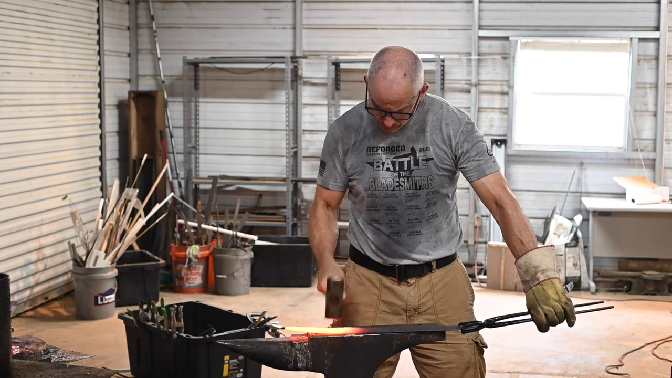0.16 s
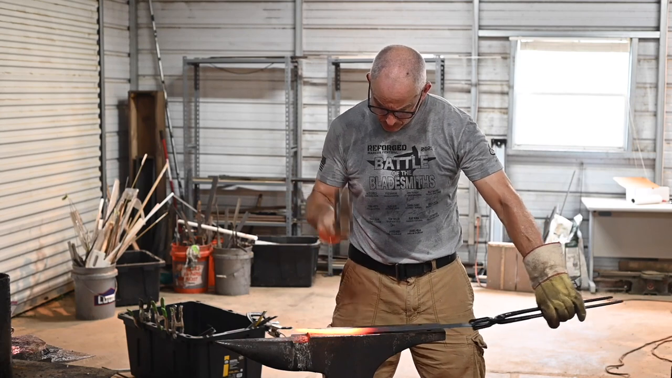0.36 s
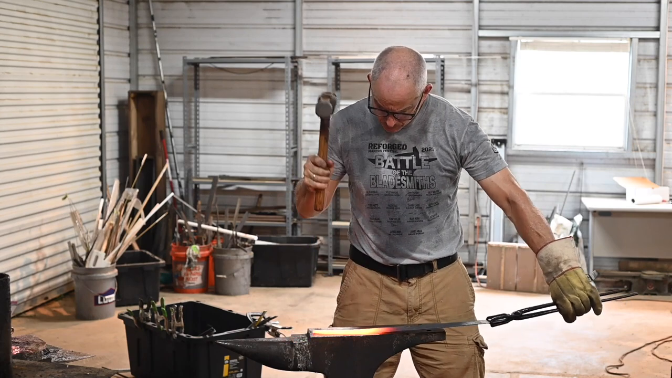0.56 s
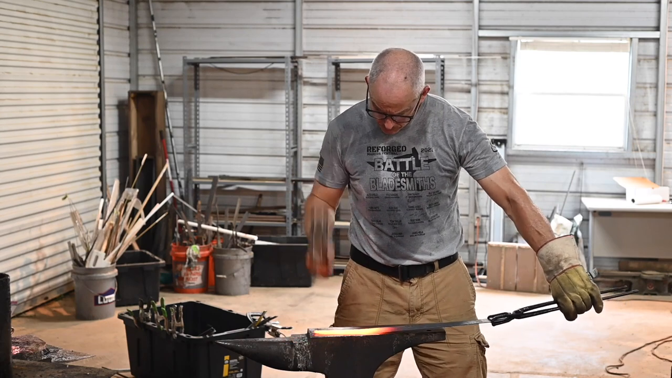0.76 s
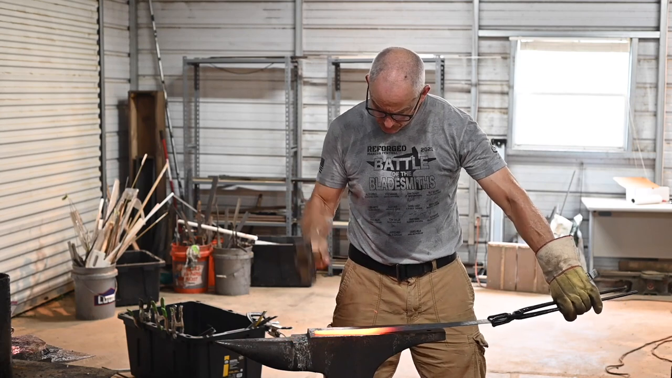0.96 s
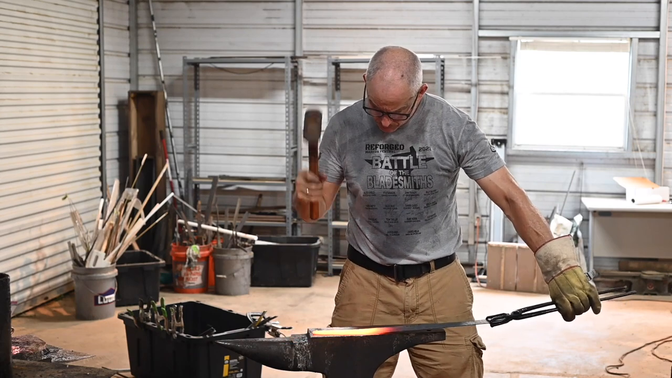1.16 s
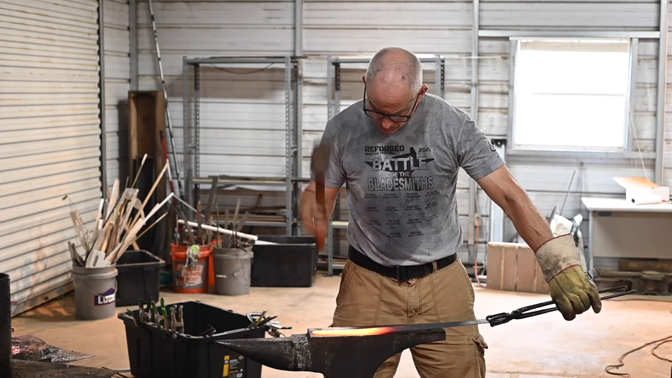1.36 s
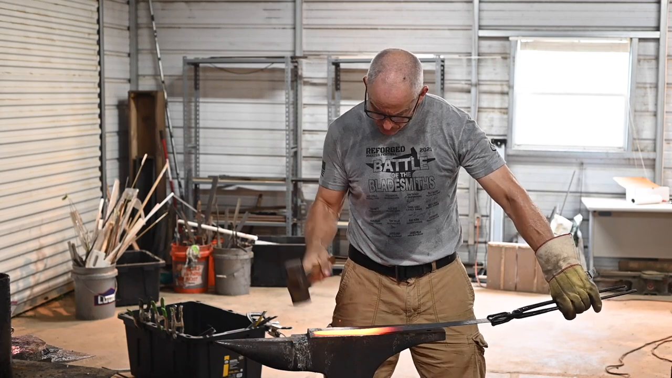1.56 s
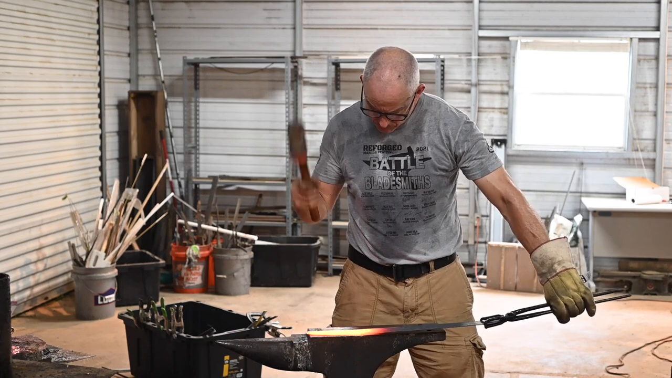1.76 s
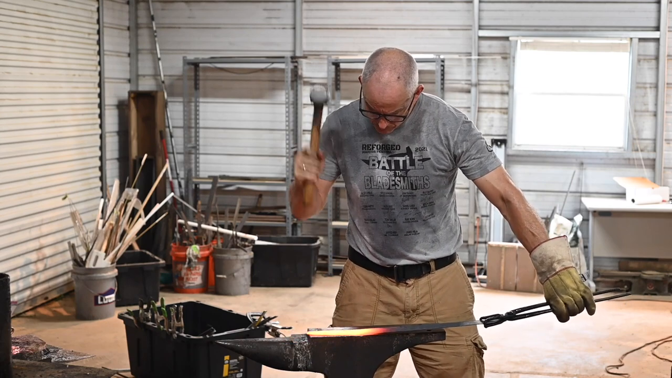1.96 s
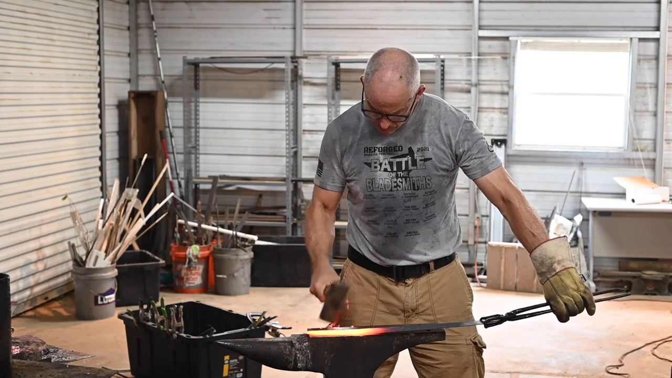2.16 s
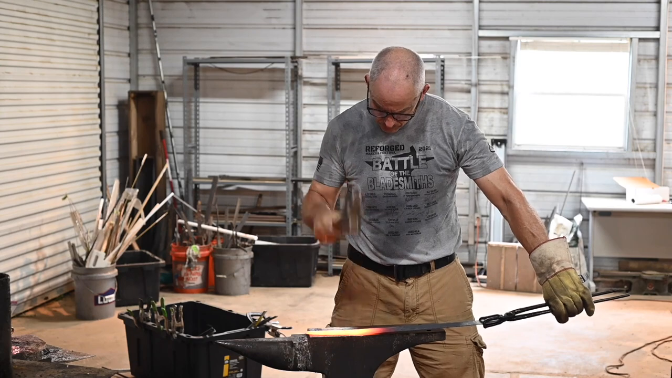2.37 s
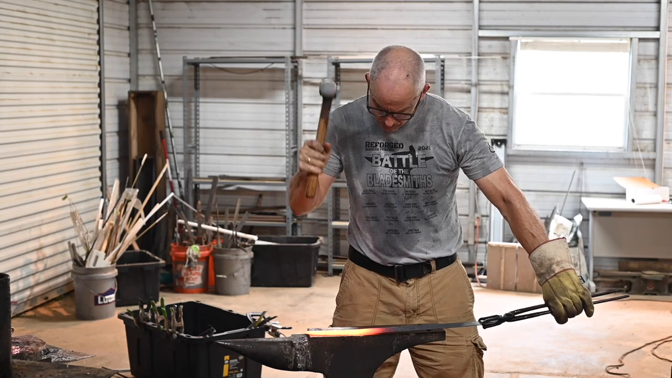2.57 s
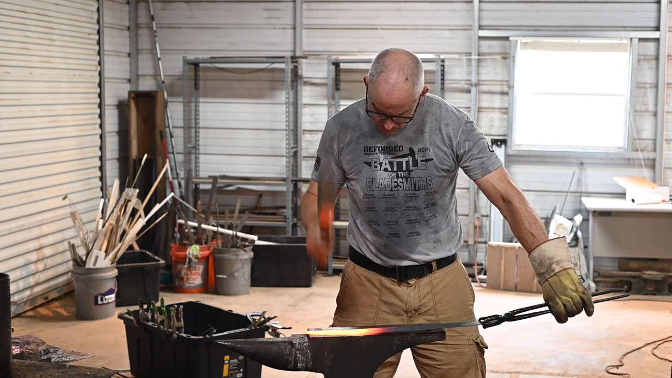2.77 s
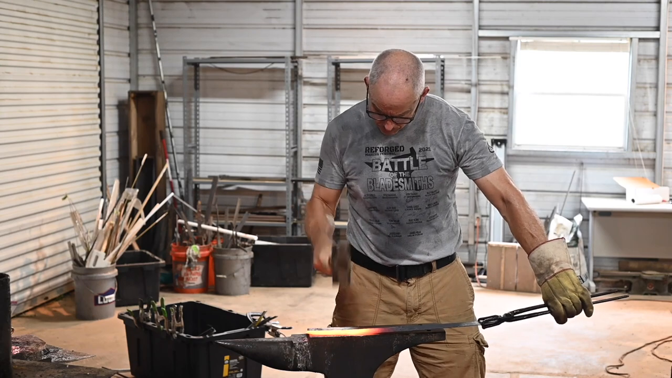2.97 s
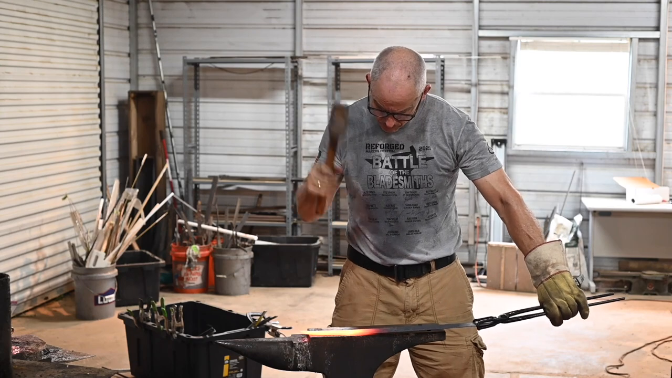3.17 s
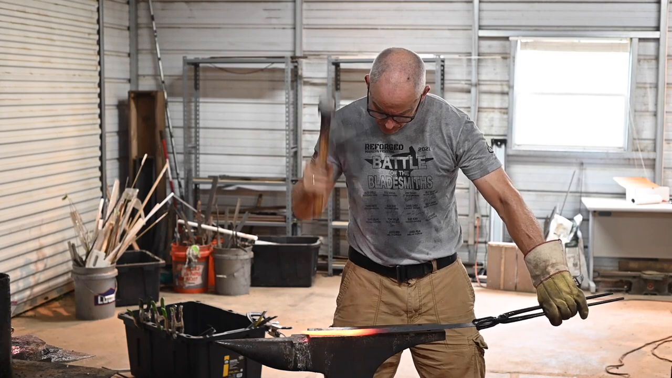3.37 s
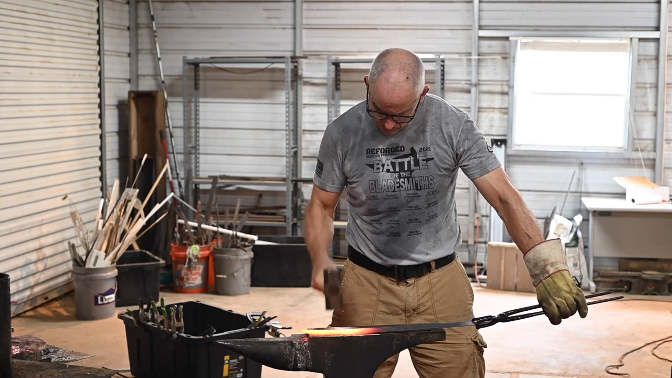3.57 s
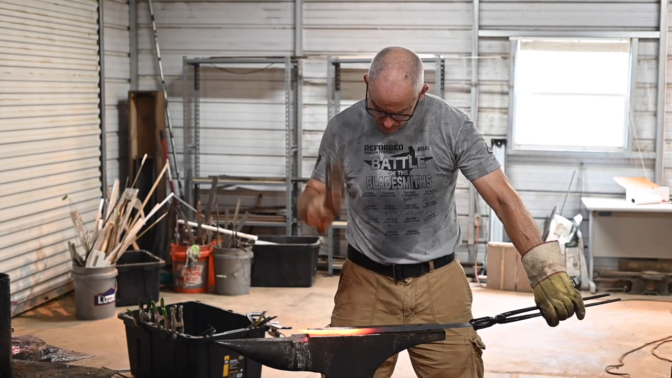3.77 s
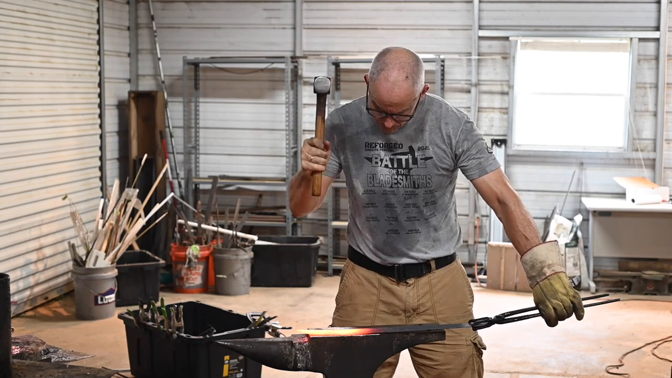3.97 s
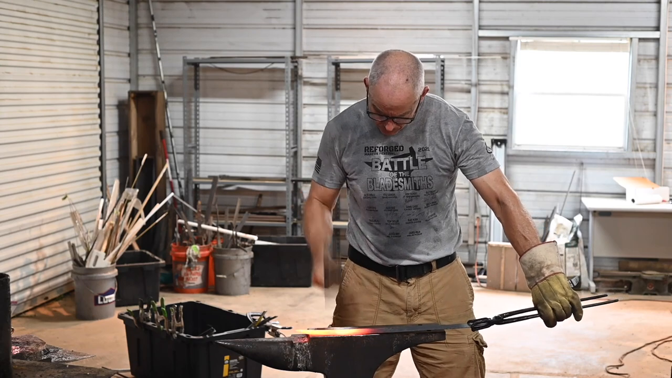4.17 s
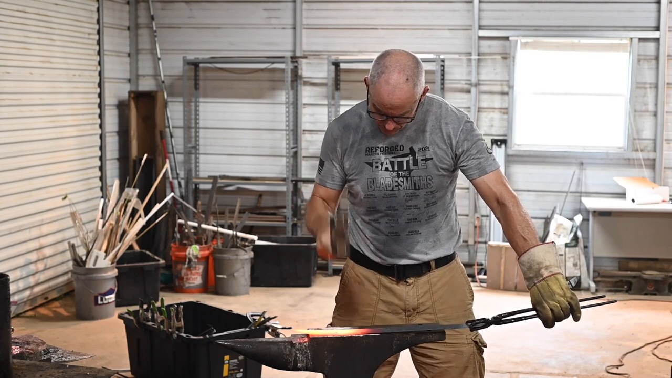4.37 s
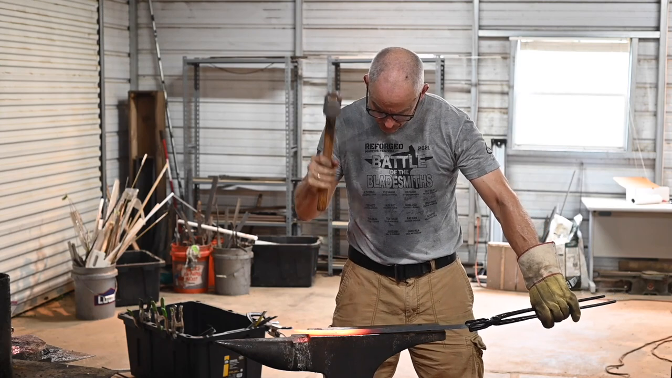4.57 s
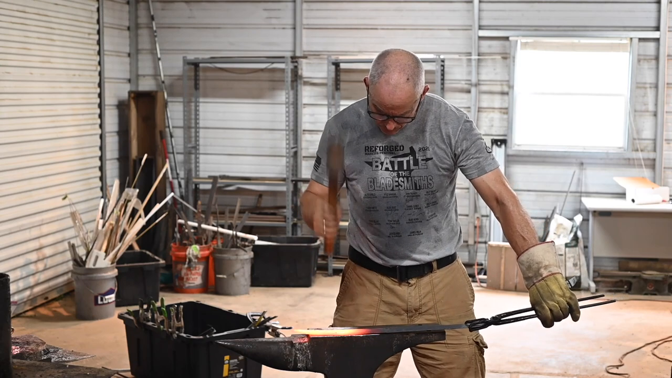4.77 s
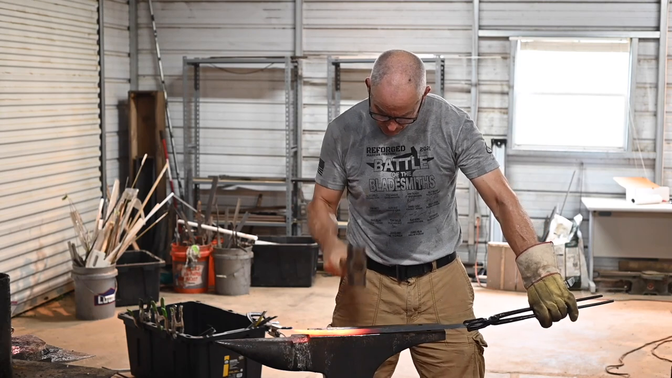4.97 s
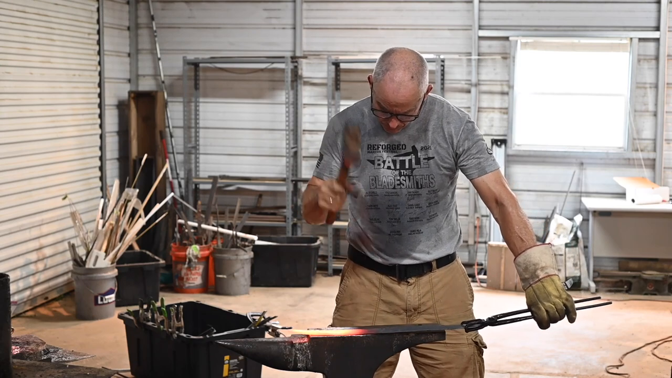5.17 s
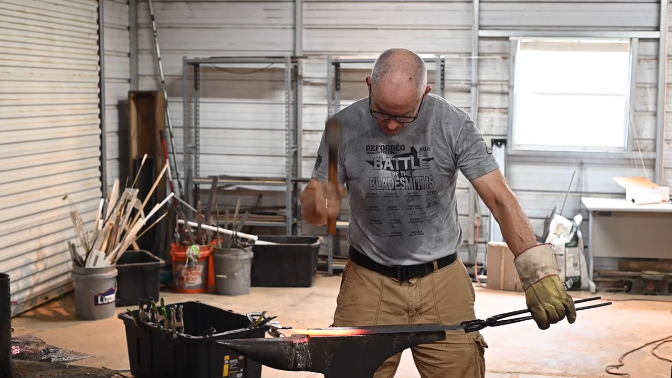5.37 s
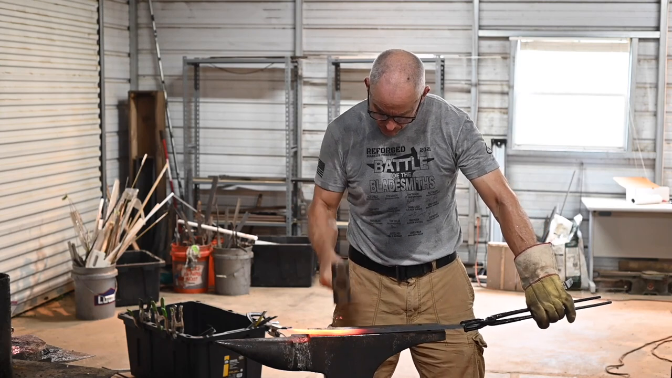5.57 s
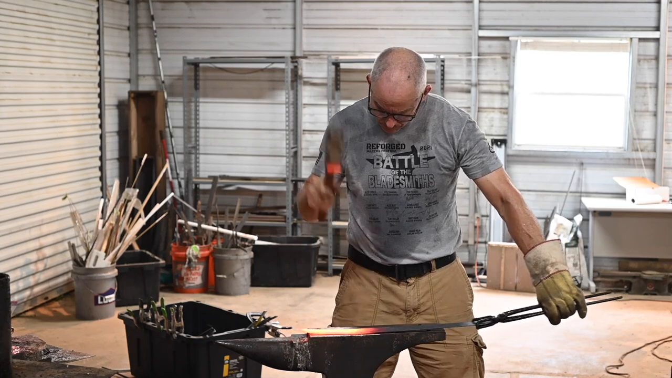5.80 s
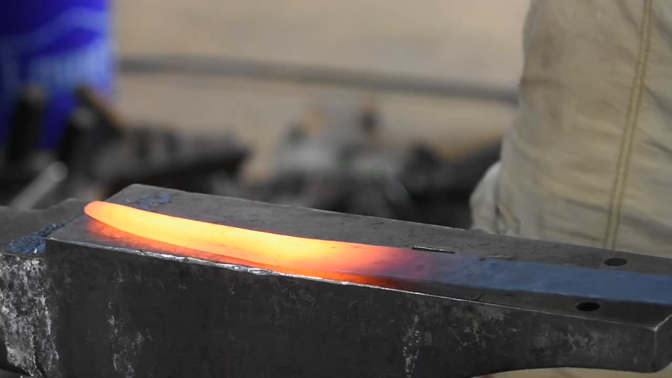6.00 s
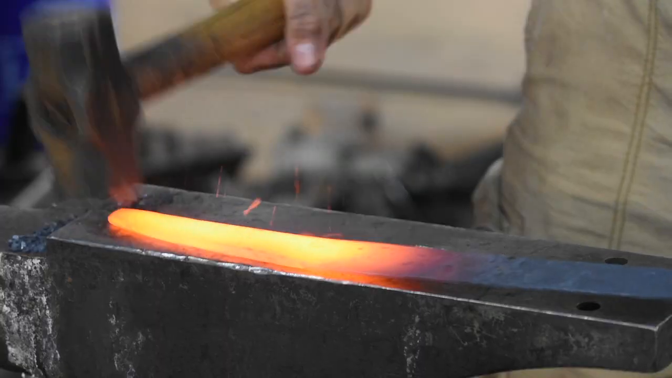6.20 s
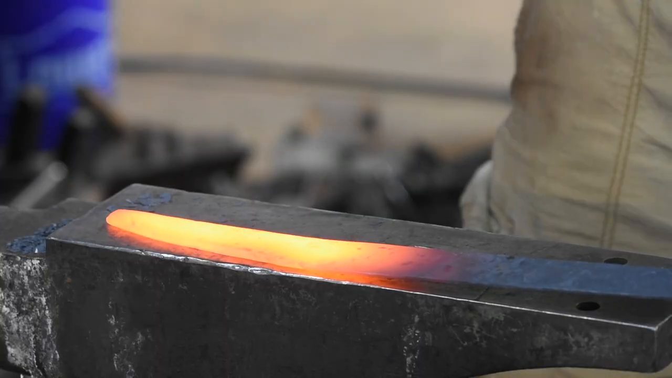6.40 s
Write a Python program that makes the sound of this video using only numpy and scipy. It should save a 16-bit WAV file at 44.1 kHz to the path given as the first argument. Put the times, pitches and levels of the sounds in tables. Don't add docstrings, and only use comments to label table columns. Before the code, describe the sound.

A hand hammer strikes hot steel on an anvil in steady rhythm, each blow cracking and ringing through a metal-walled workshop over a rushing burner.

```python
import sys
import numpy as np
from scipy import signal
from scipy.fft import rfft, irfft, next_fast_len
from scipy.io import wavfile
from scipy.ndimage import uniform_filter1d, map_coordinates

SR = 44100
rng = np.random.default_rng(int(sys.argv[2]) if len(sys.argv) > 2 else 0)


def gain_from_db(level_db):
    decades = np.asarray(level_db, float) / 20
    return 10 ** decades


def put_to_file(sound):
    columns = np.atleast_2d(sound).T
    safe = np.clip(columns, -1, 1)
    whole_steps = np.round(safe * 32767)
    wavfile.write(sys.argv[1], SR, whole_steps.astype(np.int16))


N = 283983
STEP = 64
PEAK_LAG_S = 0.00131
UNLIKE_DB, DRIFT_DB_PER_S = 0.4, 2.2
CRACK_PAN_DB, CRACK_RING_SHARE = 0.8, 0.43

# [f/Hz, level/dB per Hz]
BURNER_SPECTRUM = [(25, -60), (60, -14), (120, -14), (200, -9.5), (310, -15), (450, -20.5), (800, -17),
                   (1230, -24), (1600, -10), (2700, -21), (3400, -15.5), (4500, -25.5), (5900, -27.5),
                   (9800, -42), (14000, -90)]
# [f/Hz, t60/s]
HALL_T60 = [(80, 0.68), (300, 1.74), (1000, 1.12), (3000, 1.15), (8000, 0.92), (11500, .55), (15000, 0.43)]
# [f/Hz, correlation/1]
EAR_LIKENESS = [(100, .999), (400, .99), (1000, 0.83), (2500, 0.2), (6000, 0.082), (15000, 0.064)]
# [f/Hz, level/dB]
MICROPHONE = [(10, -60), (35, -10), (55, -10.5), (80, -3.5), (15900, 2), (16500, -21), (22050, -60)]

# [t/s, crack peak/dB, thud/dB, hall/dB, brightness/dB]
BLOWS = [
    (0.1874, 2, -25, 2, 7.5),
    (0.8641, 1.5, -24, 2.5, -8),
    (1.5186, -1, -24.5, 3, 10),
    (2.1894, -0.5, -25, 2.5, 7.5),
    (2.887, -2, -28, 2.5, 12),
    (3.5663, 2, -24, 2, 6),
    (4.2464, 0, -24.5, 0.5, 18),
    (4.9189, 1, -25, 1, 9.5),
    (5.5675, -0.5, -26, 0.5, 7),
    (6.2525, 2, -18.5, 4, -13),
]
EARLIER_BLOW = (-.49, 0, -29, 8.5, 0)
# [along face/-1..1, across face/-1..1, edge first/-1..1, hammer head ring/dB, crack f/Hz]
LANDING = [(0.53, 0.67, -0.16, -8, 9000), (0.42, 0.47, .99, -15, 10500), (-0.18, 0.39, 0.84, -10, 12000),
           (0.093, 0.56, -0.43, 7.5, 14000), (-1, -0.61, 0.46, 7.5, 8200), (-0.57, -0.37, 0.096, -8, 7500),
           (-.37, -0.38, -0.82, -3, 9200), (0.21, -0.085, -0.72, -9, 10500), (0.93, -0.56, -0.13, 5, 9900),
           (0.95, -.61, -0.13, 7, 12700), (-0.64, 0.41, -0.23, -3, 11600)]

WEAK_HZ = [1711, 1841, 3262, 3283, 3596, 4027, 4165, 4797, 4829, 4893, 5882, 6711, 6821, 7246, 8032, 8290,
           9232, 9467, 10890, 12042, 12744, 15423]
# [level/dB, t60/s, side/dB, left-right/dB]
WEAK_MODES = [(-36.5, 1.67, -22, -4), (-50, 0.9, -7, -1), (-46, 2.3, 10, 8), (-40, 1.86, -13, 2),
              (-69, 0.71, 3, -7), (-42, 1.34, -6, -3), (-40, 2.09, 1, -8), (-46.5, 1.26, -10, 3),
              (-30, 1.3, -7, -1), (-39, 2, 2.5, 6), (-40, 1.18, -6, -1), (-34.5, 1.21, -11.5, 1),
              (-41, 0.93, 2, 3), (-47, 1.31, 6.5, 17), (-60, 1.95, -2, 4), (-49.5, 1.2, -4, 2),
              (-52, 0.7, -8, 9), (-38, 1.065, 0, 12), (-56.5, 1.26, 4.5, 10), (-62, 0.47, -1, 10),
              (-48, 1.27, -4.5, 31), (-56, 1, 5, -19)]
WEAK_FAMILY = [0, 1, 2, 2, 4, 2, 0, 5, 5, 5, 6, 7, 7, 5, 8, 5, 4, 8, 4, 9, 9, 3]
# [mid-face/dB, along/dB, across/dB, edge first/dB, head ring share/1]
FAMILIES = [(1.1, -2.5, -0.5, -0.2, -0.021), (1.5, 2, -10.5, -16.5, 0), (-.6, -2.5, -5.5, -0.5, 0),
            (1, -0.5, 1, 0, 1.25), (3, -.7, -2.5, 5.5, 0.21), (-4.5, 4.5, -4, 1.4, -0.0097),
            (-1, 10.5, -4, -2, -0.26), (-1.35, 0.8, 0.5, 0.3, 0), (-1.5, 1.3, 4, -2, 0.05),
            (1.5, 5.4, -3, 1, 0.064)]
SWELLS = {1711: [(.02, 4.5), (.05, -20), (.09, 0.5), (.2, 3.5), (.3, -1), (.4, -4), (.46, 1.5), (.52, -6),
          (.6, 3)], 4165: [(.02, -2), (.05, 3), (.09, -8), (.15, 0.5), (.3, -1), (.42, -4.5), (.5, 0.5),
          (.6, -3)], 4829: [(.0, -11), (.05, -1.4), (.12, -13), (.2, -9.5), (.34, -5), (.6, 7)],
          4893: [(.04, 1), (.18, -0.5), (.24, -2), (.34, -6.5), (.41, 7), (.48, -7), (.58, 3.5),
          (.62, -2.5)], 5882: [(.02, -0.5), (.2, -1), (.32, -7), (.4, -3), (.63, 1)], 6711: [(.04, -7.5),
          (.1, 5.5), (.2, -5.5), (.3, -1.8), (.4, -1), (.48, 3.5), (.55, 0.5), (.63, -1.5)],
          7246: [(.02, 6), (.15, -6.5), (.3, 0), (.4, 1), (.63, 4)], 9467: [(.03, 0), (.25, -3.5),
          (.35, -2), (.45, 4.5), (.6, 1.5)], 12744: [(.0, -7), (.08, 2.5), (.2, 1), (.35, -2)]}

LOUD_HZ = [1521, 3408, 3835, 5849]
# [left-right/dB, phase wander/rad, wander rate/(1/s), steady share of side/1]
LOUD_TONES = [(-.3, 0.37, 3.7, 0.85), (-9, 1.4, 14, .3), (-.3, 0.65, 10, 0.43), (8.5, 1.8, 12, .4)]
LOUD_FAMILIES = [(0.43, 1.04, 1, -1.36, 0), (.3, -4.5, 2.5, 0.11, 0), (-1.1, -0.8, -4.5, -.3, 0),
                 (-0.82, 0.7, 1.2, 3.2, 0)]
# [t after blow/s, level/dB]
ANSWER = [
    [(.02, -20), (.07, -18.5), (.23, -22.5), (.275, -28.5), (.35, -24.5), (.38, -28.5), (.415, -22.5),
     (.475, -34), (.6, -30)],
    [(.02, -36.5), (.12, -34.5), (.38, -43), (.52, -36), (.64, -43.5)],
    [(.02, -33.5), (.06, -27), (.12, -45.5), (.18, -43), (.22, -30), (.43, -34), (.47, -38.5), (.63, -41)],
    [(.02, -40.5), (.05, -35), (.1, -52.5), (.16, -39), (.29, -37.5), (.51, -39.5), (.6, -40.5)],
]
# [t after blow/s, level/dB]
ANSWER_SIDE = [
    [(.02, -34), (.06, -28.5), (.21, -29.5), (.28, -44), (.38, -38.5), (.5, -28), (.64, -29.5)],
    [(.02, -44), (.07, -38), (.18, -41), (.4, -41), (.64, -43)],
    [(.02, -44), (.07, -29), (.18, -27.5), (.3, -36), (.4, -36), (.52, -38), (.64, -39)],
    [(.02, -46), (.12, -42), (.3, -33), (.5, -39.5), (.64, -46)],
]
# [rate/(1/s), neighbour share/1, first crest/s]
BEATS = [(7.2, 0.074, 0.081), (9.5, 0.5, 0.033), (9.26, 0.13, 0.086), (9.26, 0.12, 0.074)]
# [t after blow/s, level/dB]
LATE_ACROSS = [(.24, 0), (.32, -2.5), (.43, -1.5), (.5, 2.5), (.64, 2)]

# [f/Hz, level/dB, t60/s]
STAND = [(101.6, 0, 0.052), (196, -11.5, 0.12), (296, -8, 0.044), (614, -5, 0.033), (850, 0.5, 0.016)]
# [f/Hz, level/dB per Hz]
BOOM_SPECTRUM = [(30, -60), (45, -20), (60, 0), (102, -2.5), (200, -3.5), (300, -1), (430, -29), (640, -7),
                 (900, -1), (1300, -23), (2500, -44)]
# [f/Hz, level/dB per Hz]
CLANG_SPECTRUM = [(35, -60), (70, -0.5), (280, -10), (450, -17.5), (870, -11), (1200, -15), (1600, -4.5),
                  (2000, -8), (2900, -17), (3400, -5), (3650, -12), (4000, -8.5), (4500, -19), (5500, -18),
                  (7500, -19.5), (11500, -22), (15700, -22), (15900, -60)]
# [t/s, level/dB]
ECHOES = [(.004, -3), (.0095, -21), (.015, -13), (.022, -3), (.031, 3.5)]
# [t/s, level/dB]
FAR_WALL = (0.064, -5.5)


def unit(x):
    return x / np.sqrt(np.mean(x ** 2) + 1e-20)


def along(points, hz):
    f_hz, value = np.transpose(points)
    return np.interp(np.log(hz + 1), np.log(f_hz + 1), value)


def control_times_s():
    return np.arange(0, N + STEP, STEP) / SR


def smooth(control):
    return np.interp(np.arange(N), np.arange(len(control)) * STEP, control)


def wobble(rate_hz):
    return map_coordinates(rng.standard_normal(400), [control_times_s() * rate_hz])


def add(out, start_s, x):
    i = round(start_s * SR)
    x = x[:, max(-i, 0):N - i]
    out[:, max(i, 0):][:, :x.shape[1]] += x


def diffuse(n, spectrum, decay, size=512):
    hz, t, (a, b) = signal.stft(rng.standard_normal((2, n)), SR, nperseg=size)
    turn = np.arccos(np.clip(along(EAR_LIKENESS, hz), -1, 1))[:, None] / 2
    decay_db = decay * 60 * t / along(HALL_T60, hz)[:, None]
    gain = gain_from_db(along(spectrum, hz)[:, None] - decay_db)
    patches = uniform_filter1d(rng.standard_normal(a.shape), size=6, axis=0)
    patches = uniform_filter1d(patches, size=4096 // size, axis=1)
    gain = gain * gain_from_db(1.5 * np.clip(hz / 4000, 0, 1)[:, None] * unit(patches))
    left = np.cos(turn) * a + np.sin(turn) * b
    right = np.cos(turn) * a - np.sin(turn) * b
    return signal.istft(np.array([left, right]) * gain, SR, nperseg=size)[1][:, :n]


def since_blow(t):
    starts_s = np.array([EARLIER_BLOW[0]] + [b[0] for b in BLOWS]) + PEAK_LAG_S
    last = np.searchsorted(starts_s, t, "right") - 1
    return last, t - starts_s[last]


def ducking_db(t):
    return -15 * np.exp(-since_blow(t)[1] / 0.5)


def landing_db(families):
    place, slopes = np.array(LANDING)[:, :-1], np.array(families)
    return slopes[:, 0] + place @ slopes[:, 1:].T


def sing(hz, level, side_db, pan_db, wander_rad, rate_hz, steady=0):
    mid = np.sqrt(2) * level * np.exp(1j * wander_rad * wobble(rate_hz))
    loose = (wobble(rate_hz) + 1j * wobble(rate_hz)) / np.sqrt(2)
    side = gain_from_db(side_db) * (steady * 1j + (1 - steady) * loose) + np.tanh(pan_db / 17)
    carrier = np.exp(2j * np.pi * hz / SR * np.arange(N))
    return np.array([(carrier * smooth(mid * (1 + ear * side))).real for ear in (1, -1)])


def burner():
    flutter_db = wobble(2.775) + 0.99 * wobble(6.3)
    return gain_from_db(-30.5 + smooth(flutter_db)) * unit(diffuse(N, BURNER_SPECTRUM, decay=0, size=2048))


def weak_modes():
    last, u = since_blow(control_times_s())
    struck_db = landing_db(FAMILIES)[last]
    out = np.zeros((2, N))
    for hz, family, (db, t60_s, side_db, pan_db) in zip(WEAK_HZ, WEAK_FAMILY, WEAK_MODES):
        depth = 0.4 if hz < 5000 else 0.3 if 6000 < hz < 7000 else 0.12
        if hz in SWELLS:
            depth *= 0.6
        swell_db = np.interp(u, *np.transpose(SWELLS.get(hz, [(0, 0)])))
        grain = 1 + depth * (wobble(26) + 1j * wobble(26))
        build = 1 - 0.08 * np.exp(-u / 0.0033)
        level = gain_from_db(db + 14.5 + struck_db[:, family] + swell_db - 60 * u / t60_s) * build * grain
        out += sing(hz, level, side_db + 1.0, pan_db, wander_rad=2.64 * depth, rate_hz=9)
    return out


def loud_tones():
    t = control_times_s()
    last, u = since_blow(t)
    rebuild = np.clip(0.04 + (u / 0.02) ** 4, 0, 1)
    out = np.zeros((2, N))
    struck = landing_db(LOUD_FAMILIES).T
    for hz, answer, side, beat, struck_db, how in zip(LOUD_HZ, ANSWER, ANSWER_SIDE, BEATS, struck, LOUD_TONES):
        beat_hz, share, crest_s = beat
        middle_db = np.interp(u, *np.transpose(answer))
        side_db = np.interp(u, *np.transpose(side))
        heard_db = middle_db + struck_db[last] + (UNLIKE_DB + DRIFT_DB_PER_S * u) * wobble(12)
        if hz == LOUD_HZ[0]:
            across = np.array(LANDING)[last, 1]
            heard_db = heard_db + across * np.interp(u, *np.transpose(LATE_ACROSS))
        pair = (1 + share * np.exp(2j * np.pi * beat_hz * (u - crest_s))) / np.hypot(1, share)
        level = rebuild * pair * gain_from_db(heard_db - ducking_db(t))
        out += sing(hz, level, side_db - middle_db, *how)
    return out


def impact(crack_db, thud_db, bright_db, crack_hz):
    t = np.arange(SR // 5) / SR - PEAK_LAG_S
    after = np.maximum(t, 0)
    push = -0.35 * np.exp(-((t + 0.0003) / 0.00025) ** 2) + 0.3 * np.exp(-((t - 0.0006) / 0.0002) ** 2)
    spike = 1.5 * np.exp(-(t / 0.000035) ** 2) - 0.8 * np.exp(-((t - 0.00011) / 0.00005) ** 2)

    burst = np.exp(-np.where(t < 0, -t / 0.00012, t / 0.00025)) * rng.standard_normal((3, len(t)))
    burst = burst - uniform_filter1d(burst, size=15)
    burst /= np.abs(burst).max(1, keepdims=True)
    ring = np.exp(-np.where(t < 0, -t / 0.00012, t / 0.0002)) * np.cos(2 * np.pi * crack_hz * t)
    lean = gain_from_db(bright_db + CRACK_PAN_DB / 2 * np.array([[1], [-1]]))
    common = (1 - CRACK_RING_SHARE) * burst[0] + CRACK_RING_SHARE * ring
    sharp = lean * (0.59 * common + 0.14 * burst[1:])
    crack = gain_from_db(crack_db - 6.0) * (push + spike + sharp)

    thud = np.zeros(len(t))
    for hz, db, t60_s in STAND:
        thud += gain_from_db(db + rng.normal(0, 1.2) - 60 * after / t60_s) * np.sin(2 * np.pi * hz * after)
    return crack, gain_from_db(thud_db + 5.5) * thud * (1 - np.exp(-after / 0.0025))


def hammer():
    out, t = np.zeros((2, N)), np.arange(SR) / SR
    fade = np.minimum(1, (t[-1] - t) / 0.25)
    onset = 1 - np.exp(-t / 0.00048)
    far_s, far_db = FAR_WALL
    for blow, (*_, crack_hz) in zip([EARLIER_BLOW, *BLOWS], LANDING):
        start_s, crack_db, thud_db, hall_db, bright_db = blow
        crack, thud = impact(crack_db, thud_db, bright_db, crack_hz)
        add(out, start_s, gain_from_db(16.0) * crack + gain_from_db(21.0) * thud)
        add(out, start_s + far_s, gain_from_db(18.5 + far_db) * thud[None])
        for lag_s, echo_db in ECHOES:
            add(out, start_s + lag_s, gain_from_db(9.5 + echo_db) * uniform_filter1d(crack, size=9))
        clang = gain_from_db(hall_db - 23) * unit(diffuse(SR, CLANG_SPECTRUM, decay=0.89))
        clang *= 1 + 0.84 * gain_from_db(-60 * t / 0.14)
        boom = gain_from_db(thud_db - 6) * unit(diffuse(SR, BOOM_SPECTRUM, decay=2.37, size=1024))
        add(out, start_s + PEAK_LAG_S, fade * onset * (clang + boom))
    return out


def scene():
    return burner() + weak_modes() + loud_tones() + hammer()


def roll_off(x):
    return signal.sosfilt(signal.butter(12, 16510, fs=SR, output="sos"), x)


def record(dry):
    gain_db = uniform_filter1d(ducking_db(np.arange(N) / SR), size=40, origin=-19)
    x = dry * gain_from_db(gain_db)
    m = next_fast_len(N + SR // 4)
    response = gain_from_db(along(MICROPHONE, np.fft.rfftfreq(m, 1 / SR)))
    x = irfft(rfft(x, m) * response, m)[:, :N]
    return roll_off(np.clip(x, -1, 1))


dry = scene()
out = record(dry)
put_to_file(out)
```